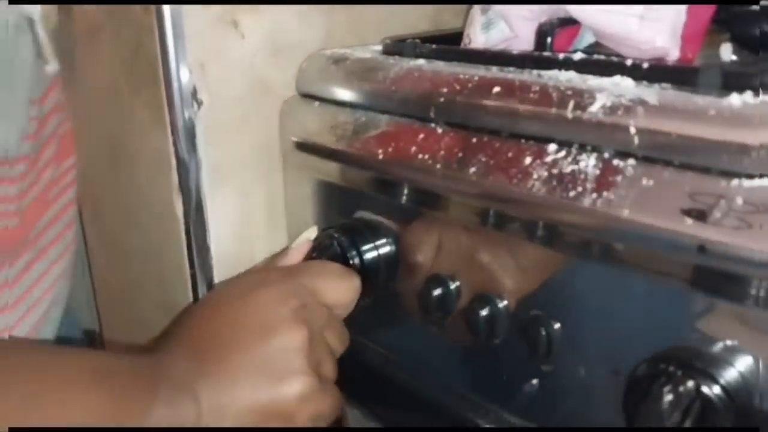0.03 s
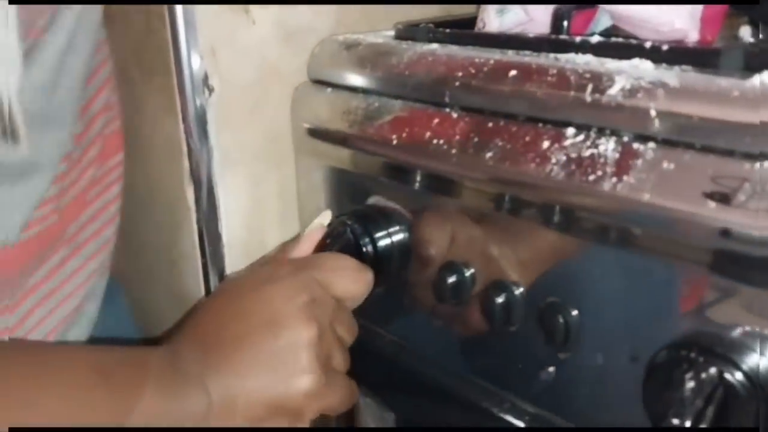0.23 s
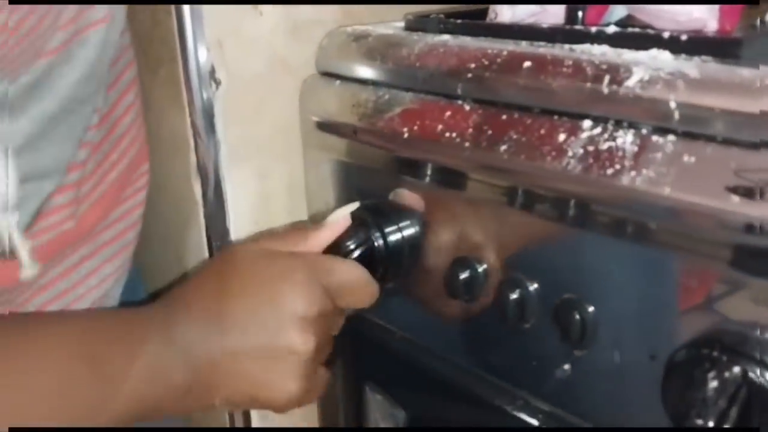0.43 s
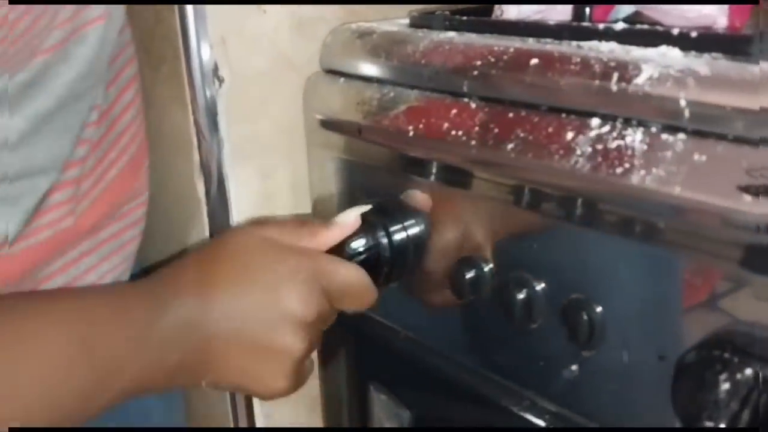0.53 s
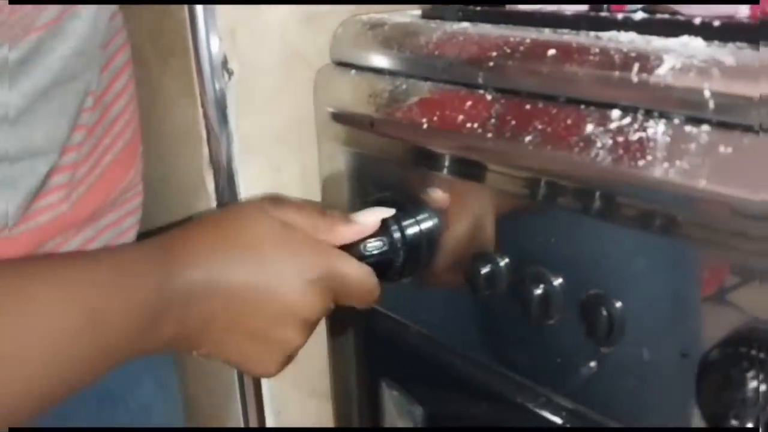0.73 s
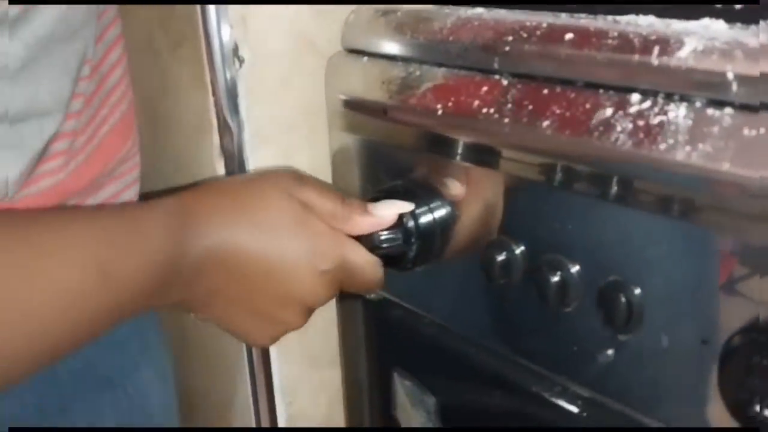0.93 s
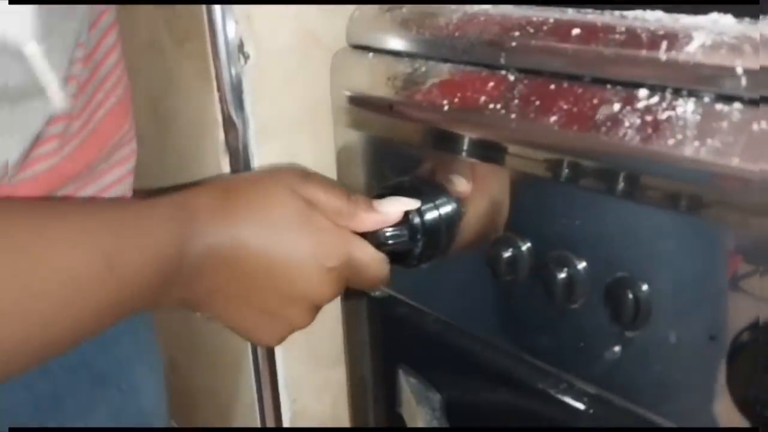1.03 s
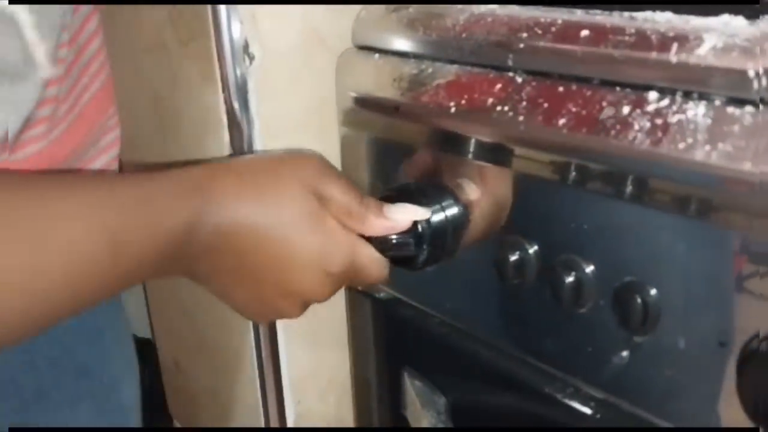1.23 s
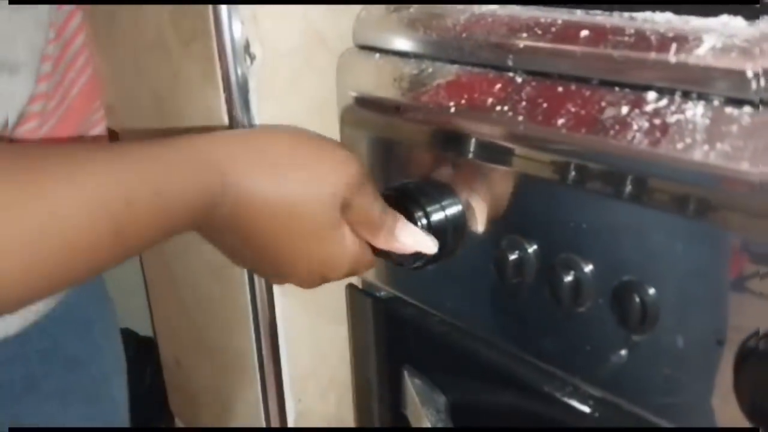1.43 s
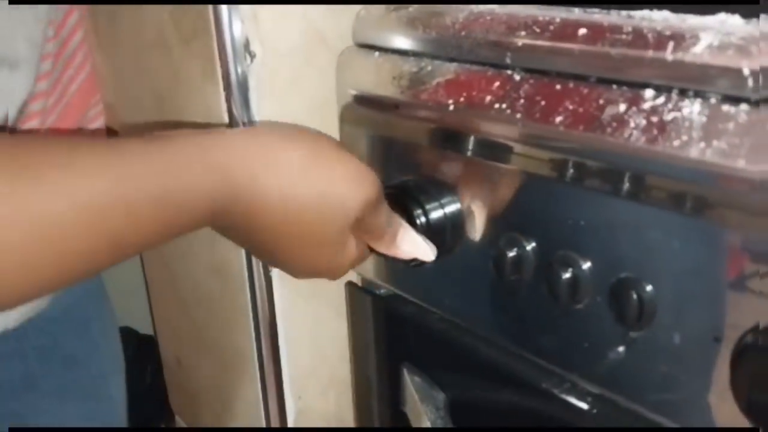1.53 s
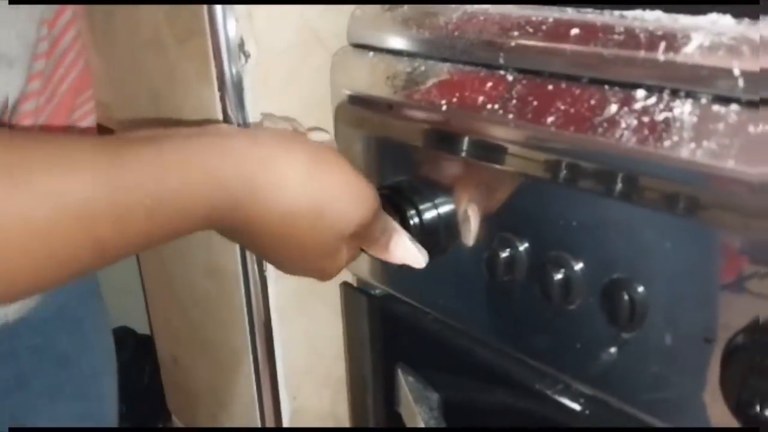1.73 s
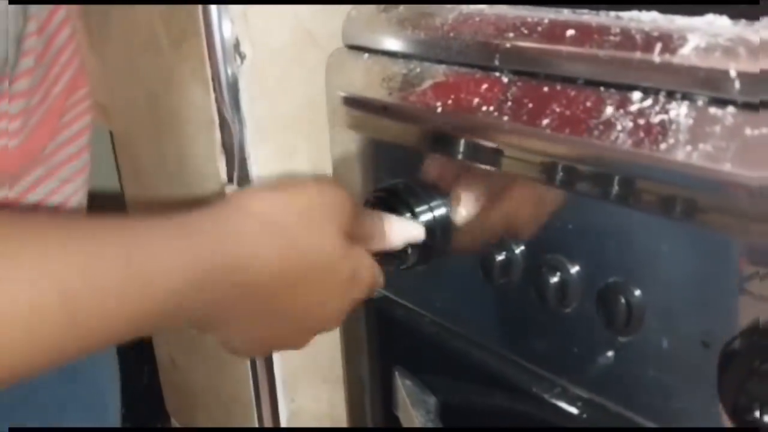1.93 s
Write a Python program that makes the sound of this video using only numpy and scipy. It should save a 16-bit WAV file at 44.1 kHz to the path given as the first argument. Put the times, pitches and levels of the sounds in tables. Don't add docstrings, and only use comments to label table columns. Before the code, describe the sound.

A hand winds a mechanical timer knob on a sheet-metal cooker, heard very close and toward the right. Soft skin friction, a click at 0.2 seconds, then a hard double snap near 0.38 with rattle and a thin, quickly fading bell ring. Uneven clicks run to 0.95 over low panel hum. After regripping, a second wind clicks from 1.2 to 1.7; a faint hollow release knock comes at 1.94.

```python
import sys
import numpy as np
from scipy import signal
from scipy.fft import rfft, irfft, next_fast_len
from scipy.io import wavfile
from scipy.ndimage import uniform_filter1d

SR = 44100
rng = np.random.default_rng(int(sys.argv[2]) if len(sys.argv) > 2 else 0)


def master(y):
    cut = np.clip(np.atleast_2d(y).T, -1, 1)
    pcm = np.round(cut * 32767)
    wavfile.write(sys.argv[1], SR, pcm.astype(np.int16))


def gain_from_db(level_db):
    decades = np.asarray(level_db, float) / 20
    return 10 ** decades


N = 85995

# f/Hz, level per Hz/dB
FLOOR_SPECTRUM = [(15, -18), (30, 18), (100, 28), (301, 16), (591, -13), (3500, -49), (5280, 2.5),
                  (8360, -20), (11000, -1), (16000, 4)]
FLOOR_DB = -65.5

# f/Hz, t60/s
KITCHEN_TAIL = [(300, 0.067), (1500, 0.37), (6000, 0.21), (15000, 0.099)]
NEAR_DB, ROOM_DB, NEAR_T60_S = -5, -7, .04
DIRECT_LEFT_DB = -9.5

# f/Hz, level/dB
LEFT_SHADING = [(60, -3.5), (1000, -2), (2500, -7.5), (5000, -6.5), (9000, -8.5), (16000, -7)]
# f/Hz, likeness/1
COHERENCE = [(30, 0.91), (150, 0.81), (400, 0.79), (1500, 0.14), (16000, 0.09)]
# f/Hz, level/dB
PORT_COLOUR = [(3500, 1), (5000, 5.5), (6500, 7.5), (8400, 1.5), (10000, 0.5), (12300, 8), (15000, 3.5)]
LEFT_LAG_S, EDGE_HZ = .0001, 15850

# t/s, level/dB, flexing mode f/Hz, door mode level/dB
PANEL_PUSH = [(0, -59.5, 189, -22.5), (.225, -63, 182.3, -19), (0.249, -52, 187.7, -22),
              (0.352, -64.5, 190, -17), (0.379, -39, 184.4, -16), (0.429, -34, 195, -12),
              (0.519, -41.5, 198.1, -0.5), (0.631, -41.5, 250, -8.5), (.72, -49, 233.2, -9),
              (0.858, -48, 240, -2), (0.961, -48, 195, -8), (1.072, -64, 190.3, -10),
              (1.117, -53, 195, -31.5), (1.282, -64, 177.9, -27.5), (1.32, -51, 190.6, -23),
              (1.485, -41.5, 194.4, -25.5), (1.56, -47.5, 226.8, 0.5), (1.74, -50, 200, 1),
              (1.842, -67.5, 191, 0)]
# f/Hz, width/Hz, level/dB
DRUM_MODES = [(106, 75, -17.5), (142.6, 71, -4.5), (195, 87, -2.5), (250, 58, -2.5), (350, 63, -7.5)]
# f/Hz, level per Hz/dB
GRIND_SPECTRUM = [(300, 2.5), (500, -7.5), (1000, 5.5), (1500, 1.5), (2300, 1), (4000, -33)]
FLEX_WIDTH_HZ, FLEX_DB, STEADY_DB, DOOR_HZ = 81, -1, -4, 150
GRIND_DB, GRIND_FOLLOW = -5, 0.94

# t/s, level/dB, skin brightness/dB
GRIP = [(0, -38.5, -9), (.07, -45, -5.5), (0.172, -38.5, 1), (0.298, -53, 10.5), (0.361, -56.5, 2),
        (.45, -51, 18.5), (.7, -59, 21), (.97, -53, 16), (1.069, -73.5, 19), (1.116, -46.5, -0.5),
        (1.21, -37, 8), (1.29, -47.5, 0.5), (1.34, -51, 7), (1.55, -42.5, -11), (1.74, -52, 14),
        (1.799, -57, 1), (1.899, -66.5, 11), (1.95, -53, 0)]
# f/Hz, level per Hz/dB
FRICTION_SPECTRUM = [(240, -78), (400, -48), (626, -17), (900, -21), (1500, -23), (2200, -2), (2900, 3.5),
                     (4200, 3), (6000, -3), (16000, -21)]
# f/Hz, width/Hz, level/dB
FRICTION_RINGS = [(2850, 510, -11), (5150, 230, -11.5)]
RUB_PATCHY_DB = 1.3

LET_GO_S, LET_GO_HZ, LET_GO_DB = 1.9405, 850, -44

# f/Hz, level per Hz/dB
RATTLE_SPECTRUM = [(300, -16), (1200, -2), (1800, -16), (2600, 1.5), (3700, -9.5), (5200, -10.5),
                   (16000, -15.5)]
RATTLE_S, RATTLE_DB, RATTLE_T60_S = .381, -21, 0.27

# level/dB, t60/s, swell/s
BELL_PARTIALS = [(-39, 0.17, 0.0037), (-31, 0.28, 0.0026), (-16, 0.41, 0.048), (-31.5, 0.81, 0.015),
                 (-50, .6, 0.022), (-24.5, 0.24, 0.024), (-44, .3, .02), (-45, 0.14, 0.026),
                 (-25.5, 0.15, 0.0067), (-17, 0.053, 0.0061), (-62, 0.21, 0.0041)]
BELL_HZ = [1247, 1276, 2591, 4291, 8808, 11692, 14995, 6352, 2652, 2990, 1070]
BELL_S, BELL_LEFT_DB, BELL_LEFT_RAD = .382, 3, 1.2
TOUCH_S, TOUCH_LENGTH_S = .477, .006
BELL_STOP_S, BELL_STOP_DB = .668, -14

# t/s, peak level/dB, knob ring share/dB, panel share/dB, bright share/dB
FIRST_WIND = [(0.2152, -13.5, -1, -29, -2.5), (0.3717, -7.5, 8, -26, -12), (0.383, -10.5, 8.5, -24, -27),
              (0.3995, -16.5, -26, -23, -19), (0.4601, -21, -4, -11.5, 11), (0.495, -31, 2, -9, -15),
              (0.5061, -16, 2, -29, 4), (0.5527, -16.5, 6, -14, 4.5), (0.626, -20.5, -3.5, -21, 2),
              (0.6700, -17, 3.5, -23.5, 10), (0.7407, -22, -7, -11, -2), (0.827, -16.5, 4, -16.5, 1.5),
              (0.913, -18.5, -0.5, -28.5, 9.5), (0.9481, -18.5, -14, -19, 11)]
# t/s, peak level/dB, knob ring share/dB, panel share/dB, bright share/dB
SECOND_WIND = [(1.106, -55, -18, -9.5, -17), (1.181, -16.5, -5, -72, 1.5), (1.3086, -25, 1, -10, 3.5),
               (1.3937, -18.5, 1, -15, -3), (1.4162, -16.5, 1, -23, 3.5), (1.4544, -19, 1, -13.5, 7.5),
               (1.5027, -28, 11, -6, 3), (1.548, -20, 7.5, -13.5, -2), (1.5593, -22, 3, -13, -6),
               (1.5943, -14, 5, -20.5, 7.5), (1.6842, -14, 5, -30, 5.5), (1.867, -51, 9.5, -44, -30),
               (1.926, -44.5, -4, -41, -17), (1.9388, -32.5, 4, -41.5, -17), (1.9414, -24, -1, -59, -21),
               (1.9454, -25.5, 6.5, -45, -19)]
TOOTH_RING_HZ = [4940, 5160, 7090, 5200, 5240, 5430, 5010, 4960, 7150, 5410, 5120, 5100, 7060, 6240, 3000,
                 5760, 4880, 5470, 4910, 5480, 4830, 5400, 7520, 4940, 5420, 5300, 5380, 5120, 5130, 5260]
# f/Hz, width/Hz, level/dB
KNOB_MODES = [(5200, 980, 6.5), (6970, 480, 8.5), (9470, 870, 13)]
# f/Hz, width/Hz, level/dB
BRIGHT_MODES = [(12130, 2500, 15), (13660, 1200, -25), (16200, 2700, -45)]
# f/Hz, width/Hz, level/dB
PANEL_MODES = [(1014, 63, 18), (784, 29, -50), (1360, 290, 8), (2350, 960, 19), (2930, 120, 10.5)]
SNAP_RISE_S, SNAP_FALL_S, SNAP_DB, CRACK_DB = .0008, .0017, -6, 11.5
SCATTER_DB, SCATTER_FALL_S, SCATTER_PER_S = -3, .005, 4000
RING_WIDTH_HZ, RING_WET_DB = 620, -5


def evened(x):
    return x / np.sqrt(np.mean(x ** 2) + 1e-20)


def read(points, hz):
    f, value = np.transpose(points)
    return np.interp(np.log(hz + 1), np.log(f + 1), value)


def level(curve, share=1):
    rows = np.transpose(curve)
    db = np.interp(np.arange(N) / SR, rows[0], rows[1])
    return gain_from_db(share * (db + 50.5) - 52.5)


def resonate(x, hz, width):
    b, a = signal.iirpeak(min(hz, SR * .45), max(hz / width, .3), SR)
    return signal.lfilter(b, a, x)


def rings(x, table):
    return sum(gain_from_db(db) * resonate(x, hz, w) * np.sqrt(1000 / w) for hz, w, db in table)


def noise(shape, patchy_db, size=512):
    frames, hz = 4 * N // size + 5, np.fft.rfftfreq(size, 1 / SR)
    a, b, c, d, patches = rng.standard_normal((frames, len(hz), 5)).T
    patches = uniform_filter1d(patches, size=8, axis=0)
    patches = evened(uniform_filter1d(patches, size=12, axis=1))
    same = np.clip(read(COHERENCE, hz), -1, 1)[:, None]
    right = a + 1j * b
    left = same * right + np.sqrt(1 - same ** 2) * (c + 1j * d)
    z = np.array([left, right])
    z *= gain_from_db(read(shape, hz)[:, None] + patchy_db * patches)
    return evened(signal.istft(z, nperseg=size, noverlap=3 * size // 4)[1][:, :N])


def room_floor():
    return gain_from_db(FLOOR_DB) * noise(FLOOR_SPECTRUM, 2.1, size=2048)


def space(x, size=16384):
    taps = rng.standard_normal((2, 2, size))
    hz, t, z = signal.stft(taps[0], SR, nperseg=256)
    decay = gain_from_db(-60 * t / read(KITCHEN_TAIL, hz)[:, None])
    far = signal.istft(z * decay, SR, nperseg=256)[1][:, :size]
    near = taps[1] * gain_from_db(-60 * np.arange(size) / SR / NEAR_T60_S)
    tail = gain_from_db(NEAR_DB) * near / np.linalg.norm(near[0]) + gain_from_db(ROOM_DB) * far / np.linalg.norm(far[0])
    tail[:, :60] = 0
    tail[:, 0] = gain_from_db([DIRECT_LEFT_DB, 0])
    return signal.fftconvolve(x[None], tail, axes=1)


def panel_hum():
    push = noise([(40, 0.0), (100, -0.5), (600, -6.0), (1500, -1)], 1.47, size=2048)
    t = np.arange(N) / SR
    s, _, hz, door_db = np.transpose(PANEL_PUSH)
    turn = np.exp(2j * np.pi * np.cumsum(np.interp(t, s, hz)) / SR)
    r = np.exp(-np.pi * FLEX_WIDTH_HZ / SR)
    slow = signal.lfilter([1 - r], [1, -r], push / turn)
    slow = signal.lfilter([1 - r], [1, -r], slow)
    flex = evened((turn * slow).real) + gain_from_db(STEADY_DB) * turn.real
    hum = evened(evened(rings(push, DRUM_MODES)) + gain_from_db(FLEX_DB) * flex)
    door = gain_from_db(np.interp(t, s, door_db)) * np.sin(2 * np.pi * DOOR_HZ * t)
    return level(PANEL_PUSH) * (hum + door)


def shaft_grind():
    grind = noise(GRIND_SPECTRUM + [(9000, -50)], 2.5)
    return gain_from_db(GRIND_DB) * level(PANEL_PUSH, GRIND_FOLLOW) * grind


def rub():
    friction = noise(FRICTION_SPECTRUM, RUB_PATCHY_DB)
    rows = np.transpose(GRIP)
    skin = gain_from_db(np.interp(np.arange(N) / SR, rows[0], rows[2]))
    shaft_ring = rings(friction, FRICTION_RINGS[1:]) / np.maximum(skin, .4)
    skin_ring = rings(friction, FRICTION_RINGS[:1])
    fizz = 2 * resonate(friction, 12700, 3700)
    return level(GRIP) * evened(friction + shaft_ring + skin * (skin_ring + fizz))


def let_go():
    t = np.maximum(np.arange(N) / SR - LET_GO_S, 0)
    return gain_from_db(LET_GO_DB - 60 * t / 0.041) * np.sin(2 * np.pi * LET_GO_HZ * t)


def rattle():
    t = np.arange(N) / SR - RATTLE_S
    chatter = gain_from_db(1.2 * evened(uniform_filter1d(rng.standard_normal(N), size=90)))
    decay = gain_from_db(RATTLE_DB - 60 * abs(t) / RATTLE_T60_S) * (t > 0)
    return noise(RATTLE_SPECTRUM, 2.76, size=256) * chatter * decay


def bell():
    now = np.arange(N) / SR
    t = np.maximum(now - BELL_S, 0)
    phase = np.array([[BELL_LEFT_RAD], [0]])
    tones = [np.sin(2 * np.pi * hz * t + phase) for hz in BELL_HZ]
    clock = t + BELL_S
    rest = gain_from_db(BELL_STOP_DB * np.clip((clock - BELL_STOP_S) / TOUCH_LENGTH_S, 0, 1))
    brush = np.tanh((clock - TOUCH_S) / TOUCH_LENGTH_S)
    tones[2] = tones[2] * brush * rest
    ring = 0
    for tone, (db, t60, swell) in zip(tones, BELL_PARTIALS):
        ring = ring + gain_from_db(db - 60 * t / t60) * (1 - np.exp(-(t / swell) ** 2)) * tone
    return gain_from_db([[BELL_LEFT_DB], [0]]) * ring


def ratchet():
    out, t = np.zeros((2, N + SR)), np.arange(4000) / SR
    thin = signal.butter(2, 3000, "high", fs=SR, output="sos")
    rise = np.minimum(t / SNAP_RISE_S, 1) ** 2
    body = rings(1. * (t == 0), PANEL_MODES)
    body = signal.sosfilt(signal.butter(2, 600, "high", fs=SR, output="sos"), body / abs(body).max())
    teeth = FIRST_WIND + SECOND_WIND
    for hz, (s, db, ring_db, panel_db, bright_db) in zip(TOOTH_RING_HZ, teeth):
        burst = rng.standard_normal(4000) * rise
        grains = rng.random(4000) < SCATTER_PER_S / SR
        scatter = gain_from_db(SCATTER_DB) * np.exp(-t / SCATTER_FALL_S) * grains
        snap = burst * (np.exp(-t / SNAP_FALL_S) + scatter)
        scrape = gain_from_db(CRACK_DB) * resonate(snap, 4550, 5600) + rings(snap, KNOB_MODES)
        scrape = signal.sosfilt(thin, scrape + gain_from_db(bright_db) * rings(snap, BRIGHT_MODES))
        decay = np.exp(-np.pi * RING_WIDTH_HZ / 2 * t)
        ring = gain_from_db(ring_db) * rise * decay * np.sin(2 * np.pi * hz * t)
        wet_ring = gain_from_db(RING_WET_DB) * ring
        sound = space(scrape / abs(scrape).max() + wet_ring + gain_from_db(panel_db + 17.5) * body)
        sound[:, :len(t)] += (1 - gain_from_db(RING_WET_DB)) * gain_from_db([[DIRECT_LEFT_DB], [0]]) * ring
        at = round((s - .0008) * SR)
        out[:, at:at + sound.shape[1]] += gain_from_db(db - SNAP_DB) * gain_from_db(-7.0) * sound
    return out[:, :N]


def scene():
    panel = panel_hum() + shaft_grind()
    timer = panel + rub() + let_go() + rattle() + bell() + ratchet()
    size = next_fast_len(N + 512)
    hz = np.fft.rfftfreq(size, 1 / SR)
    left = gain_from_db(read(LEFT_SHADING, hz)) * np.exp(-2j * np.pi * hz * LEFT_LAG_S)
    ports = gain_from_db(read(PORT_COLOUR, hz)) * np.array([left, np.ones(len(hz))])
    heard = irfft(rfft(timer, size) * ports, size)[:, :N]
    return gain_from_db(2.5) * heard + room_floor()


def band_limit(x):
    return signal.sosfilt(signal.butter(12, 16390, fs=SR, output="sos"), x)


def record(dry):
    low_pass = signal.firwin(301, EDGE_HZ, window=("kaiser", 8), fs=SR)
    cut = signal.oaconvolve(dry, low_pass[None], "same")
    return band_limit(np.clip(cut, -1, 1))


dry = scene()
out = record(dry)
master(out)
```